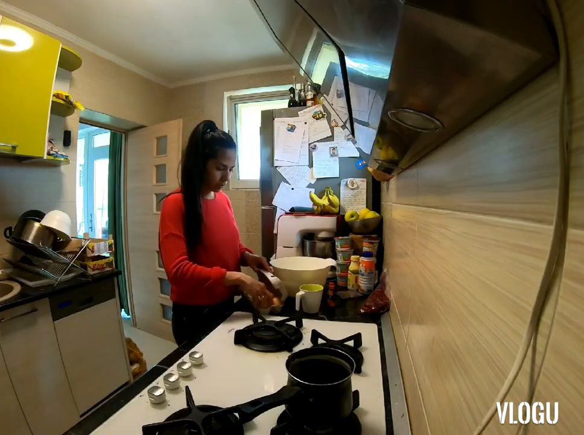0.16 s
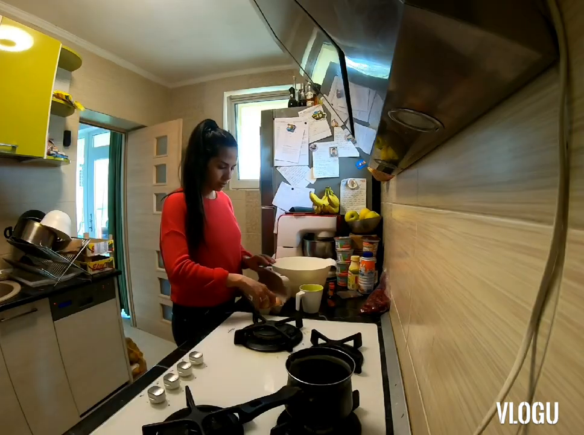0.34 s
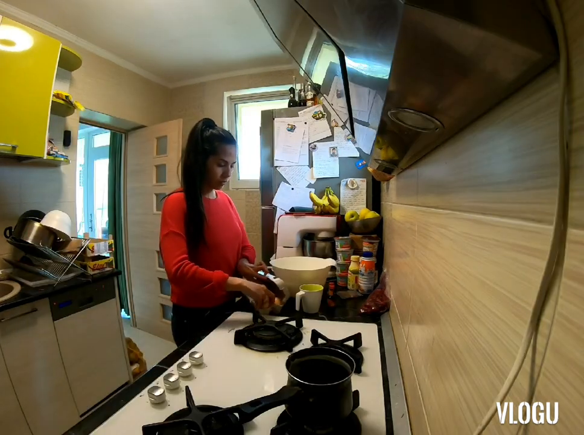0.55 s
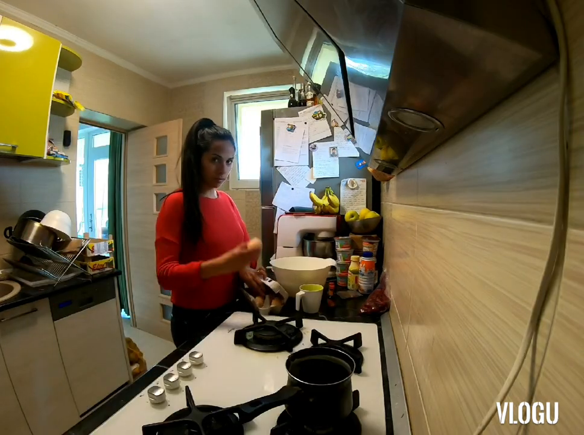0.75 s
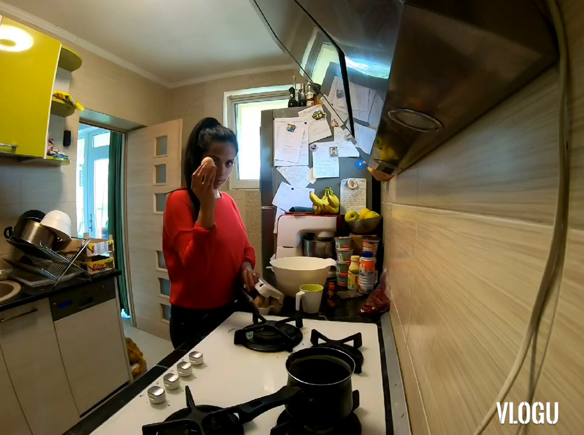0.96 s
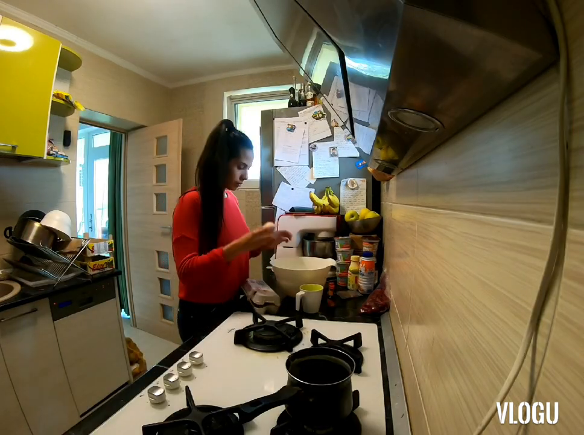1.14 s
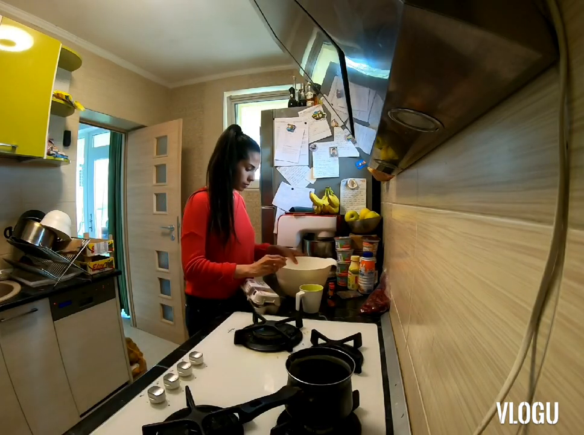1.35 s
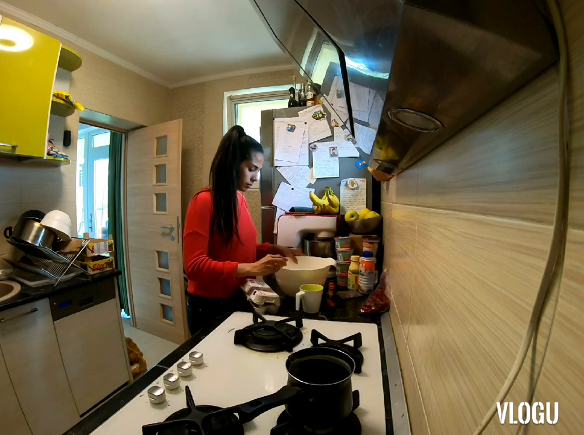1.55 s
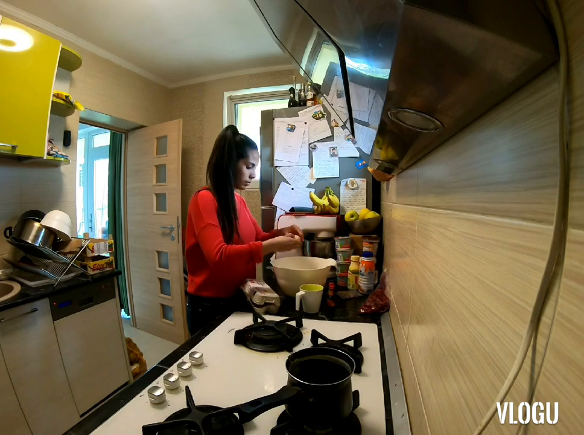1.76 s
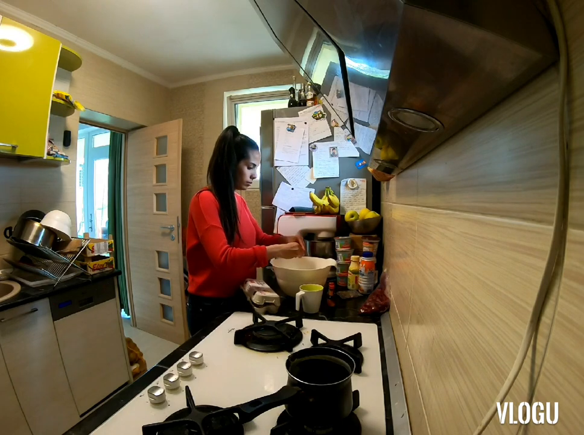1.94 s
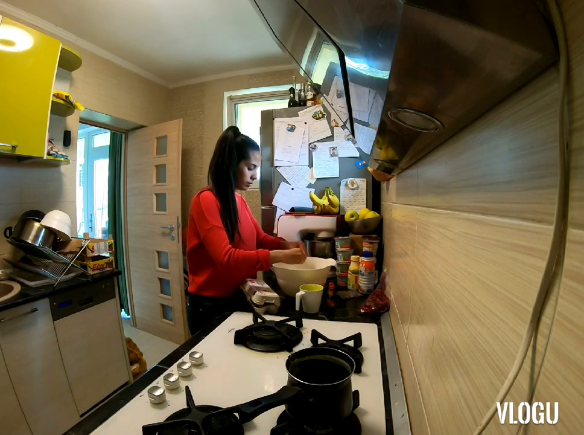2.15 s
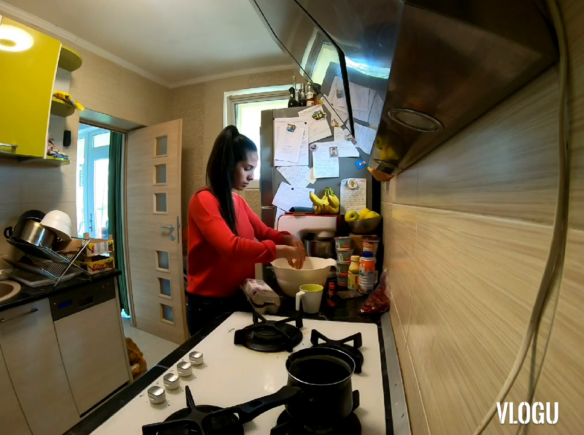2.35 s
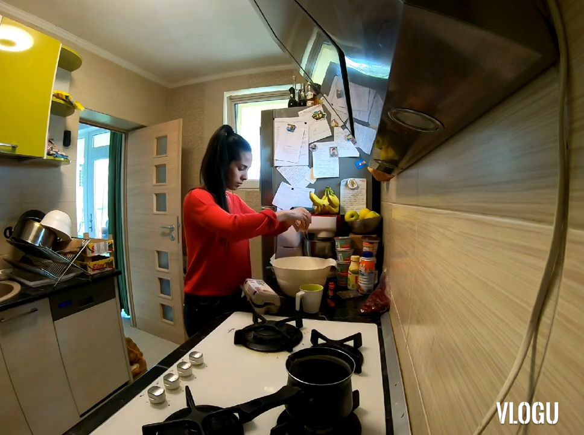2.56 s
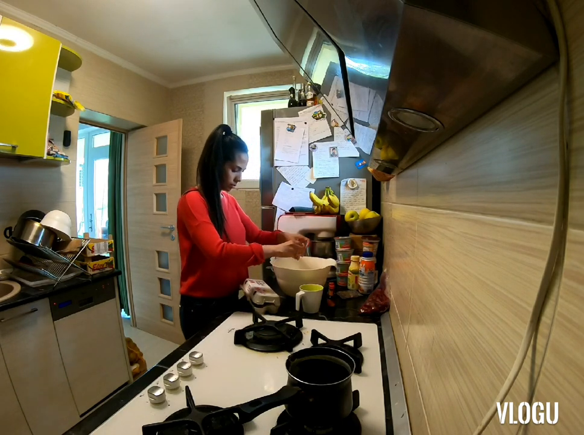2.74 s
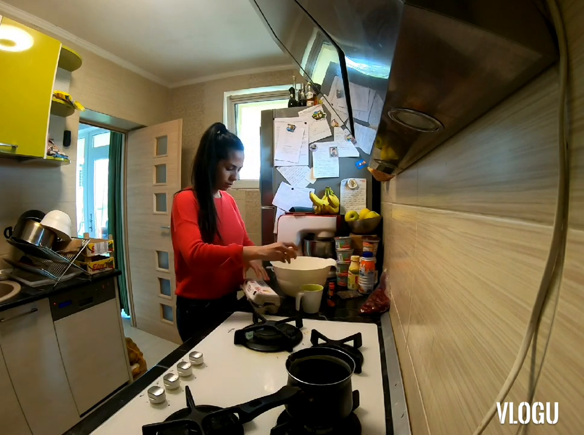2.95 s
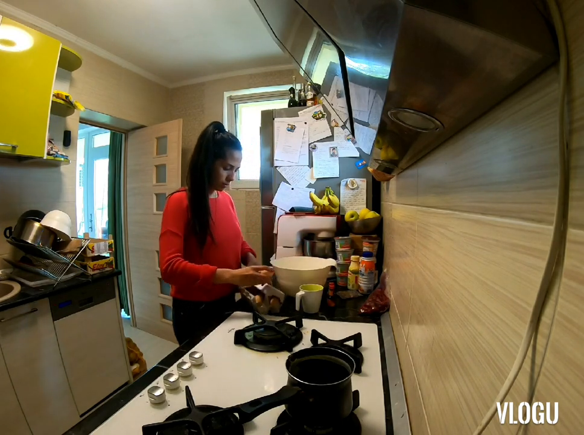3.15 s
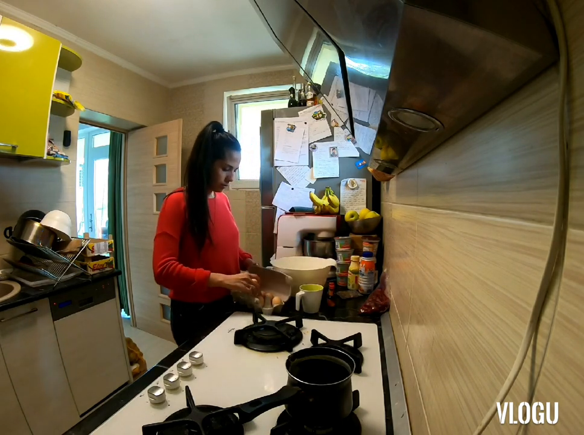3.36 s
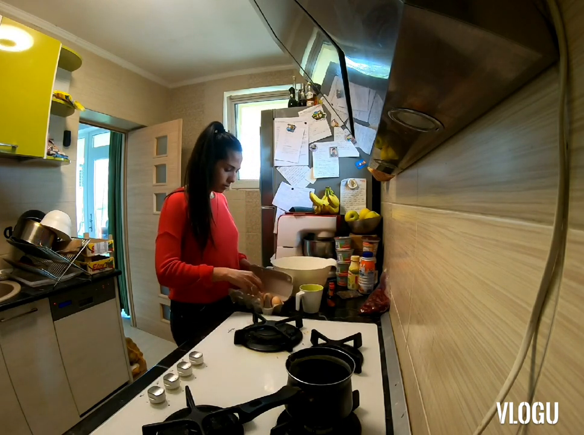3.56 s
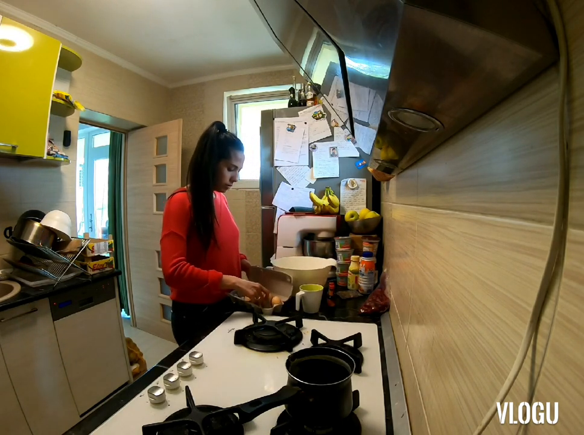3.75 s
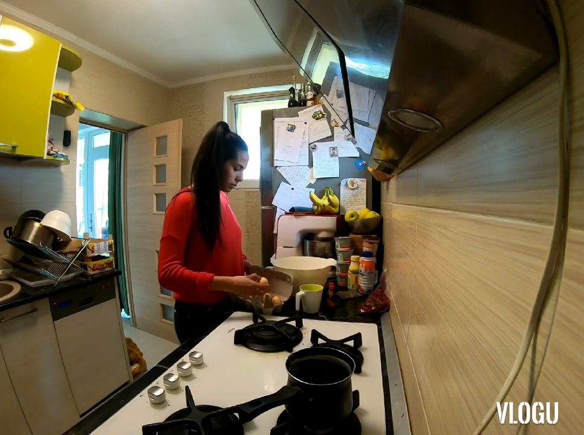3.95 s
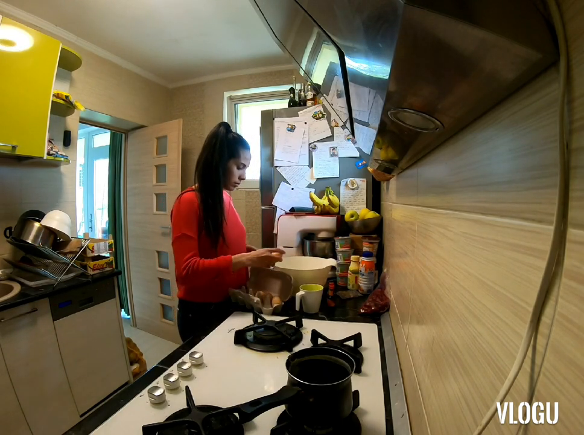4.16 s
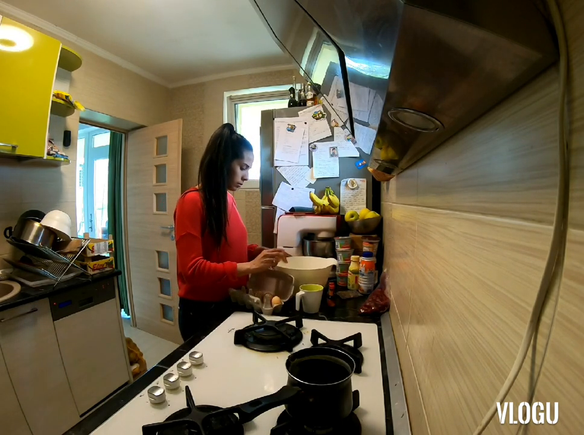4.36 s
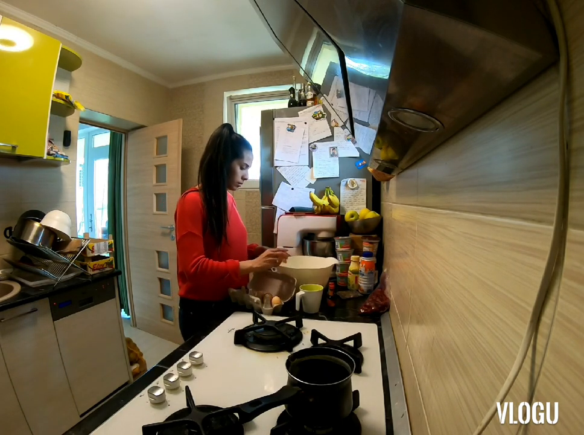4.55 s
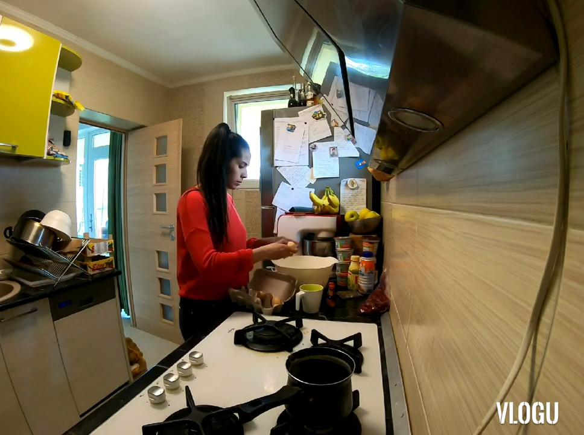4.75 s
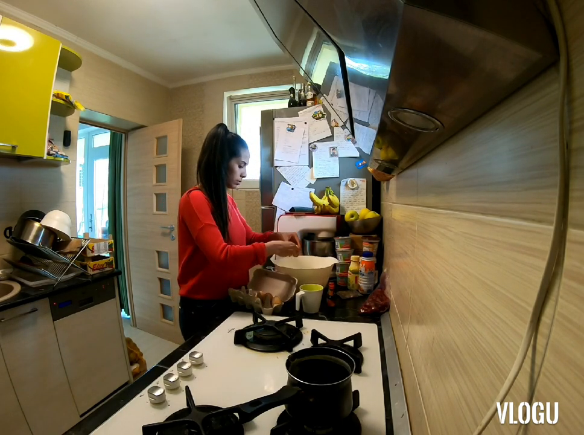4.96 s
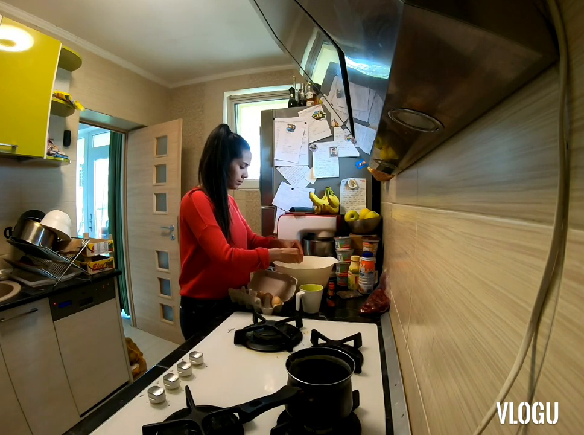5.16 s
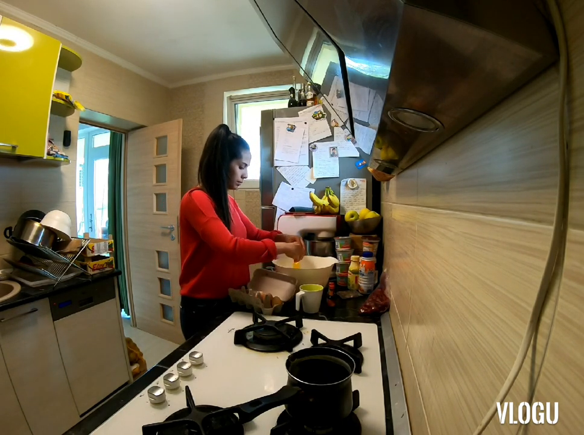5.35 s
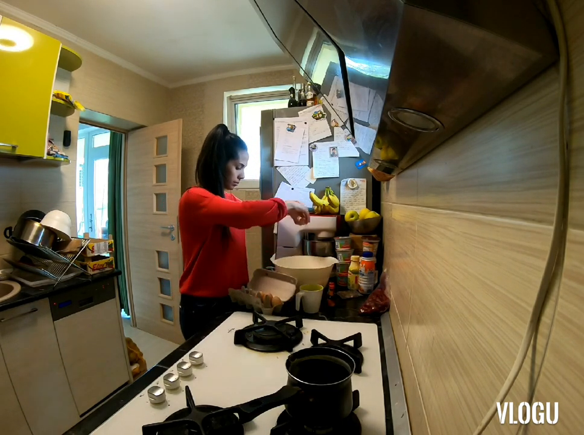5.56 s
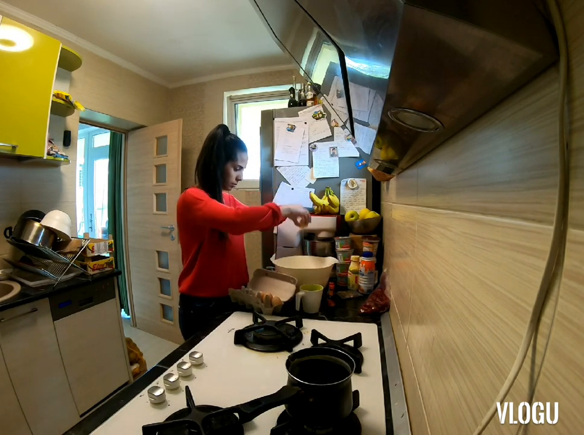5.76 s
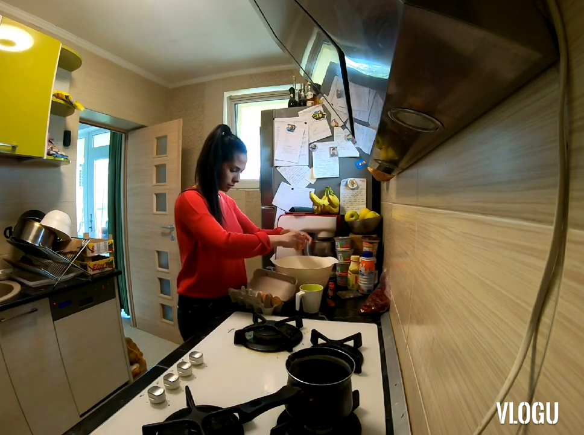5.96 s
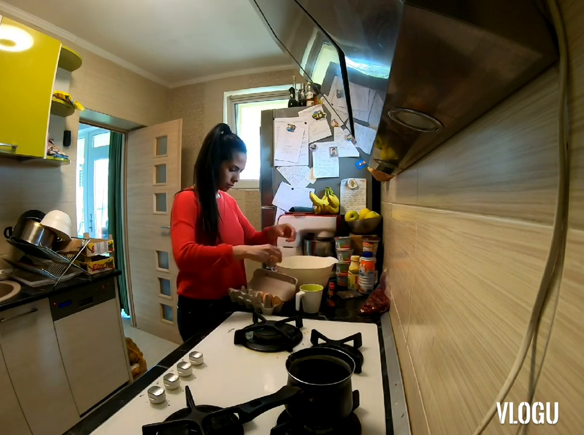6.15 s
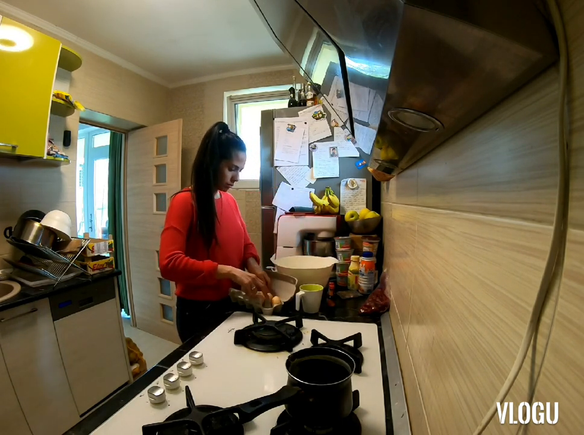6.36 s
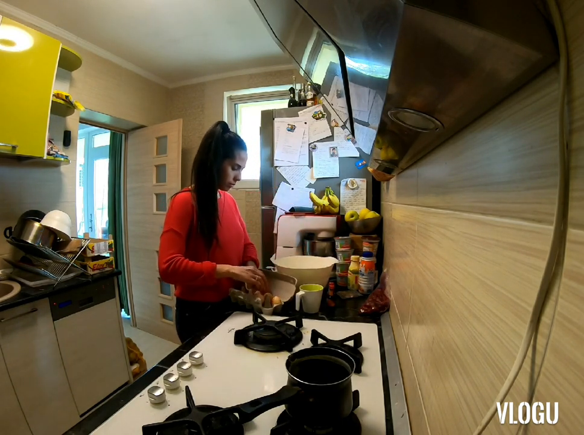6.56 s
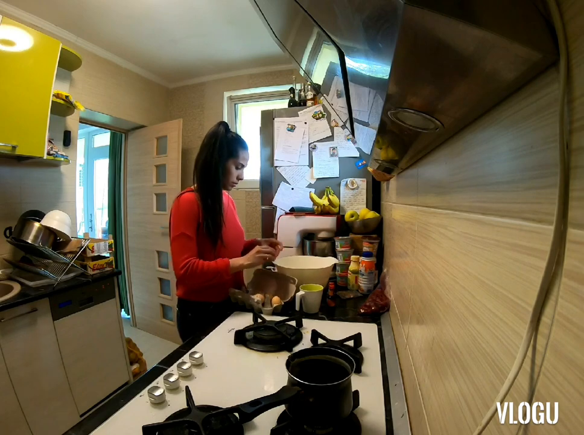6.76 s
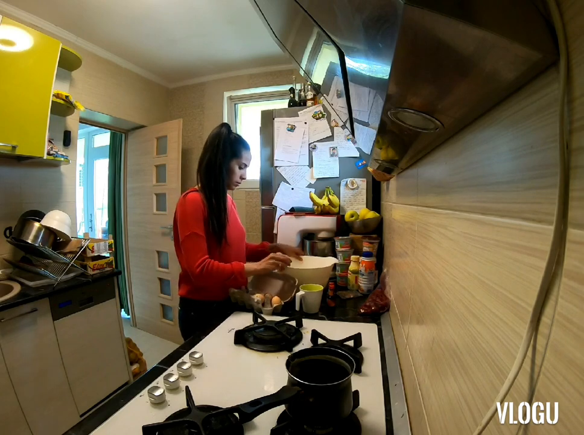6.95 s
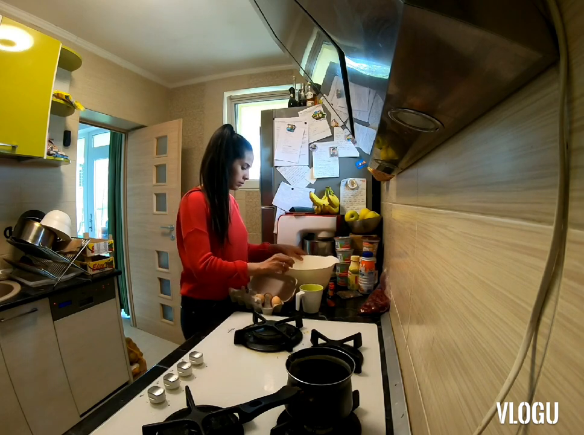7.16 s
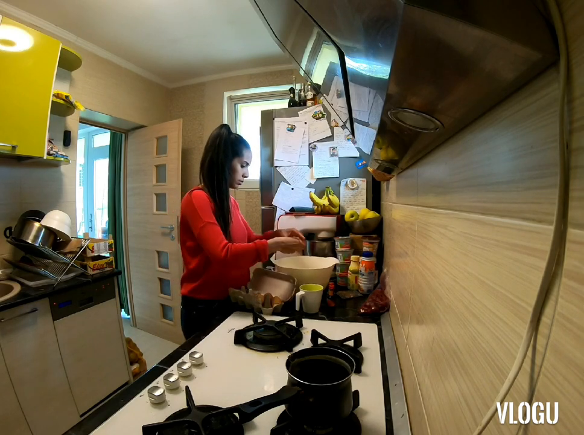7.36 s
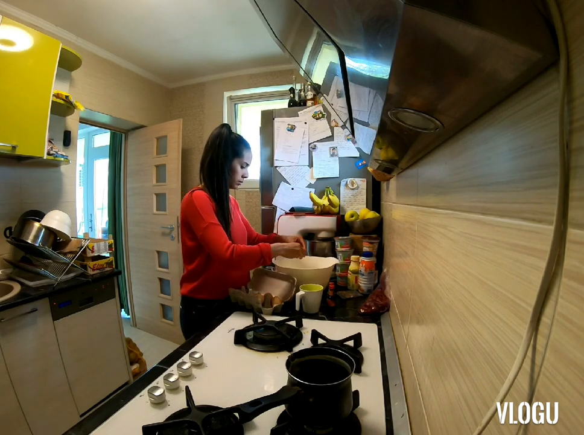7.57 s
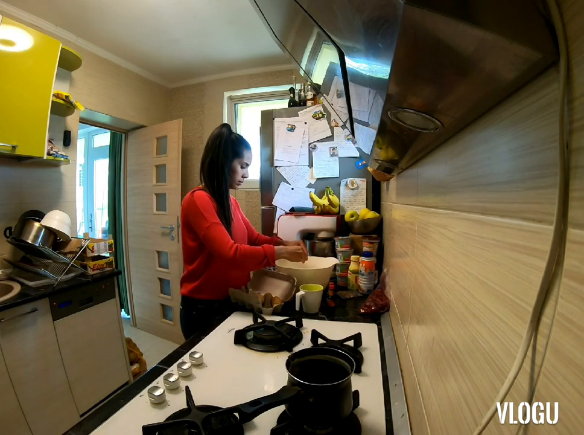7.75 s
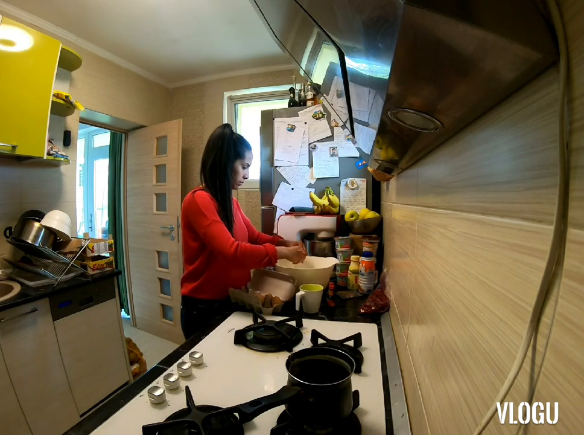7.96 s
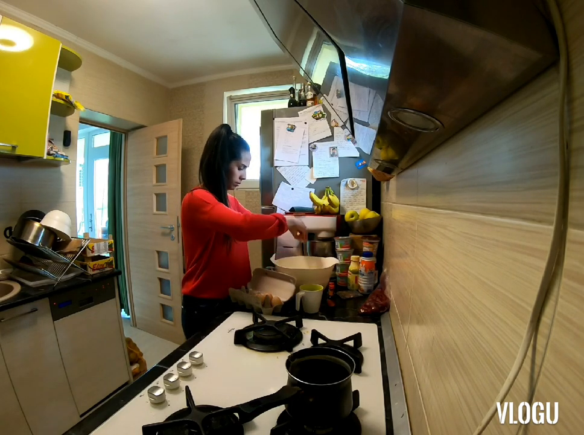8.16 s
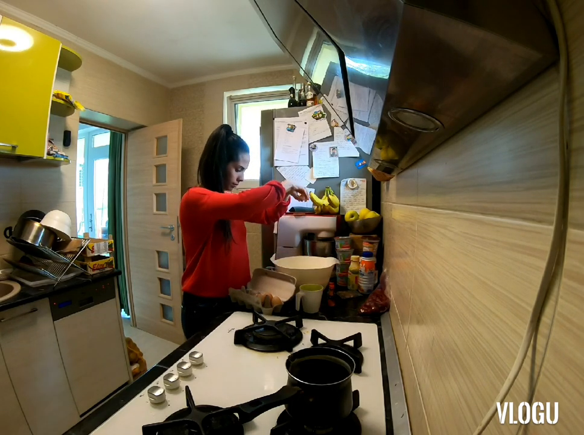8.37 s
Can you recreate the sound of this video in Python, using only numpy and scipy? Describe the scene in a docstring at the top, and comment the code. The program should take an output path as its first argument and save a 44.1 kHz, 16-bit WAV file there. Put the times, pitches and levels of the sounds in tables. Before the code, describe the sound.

Three eggs are cracked one after another at a kitchen counter. Each begins with papery rubbing, crinkles and little tocks from the pack, then firm plasticky thuds with a clack and brief low counter boom as it meets the bowl rim. Shell caves in with gritty crunches, then thin splinters click and snap with small high hollow notes. Mono pickup in a small reflective room, quiet fuzzy hum beneath, no deep silence.

```python
"""Over room air and a quiet appliance hum, three eggs in turn rustle and bump out of their pack,
noise-like crinkles and short resonant tocks, with soft low thumps. Each is knocked on a plastic bowl's rim:
thud, clack, decaying bowl modes and counter boom. The shell caves in as runs of tiny fractures,
crackles faintly as it is pried, then snaps apart with small hollow notes; a small kitchen echoes the clicks."""
import sys
import numpy as np
from scipy import signal
from scipy.fft import rfft, irfft, next_fast_len
from scipy.io import wavfile
from scipy.ndimage import map_coordinates

SR = 44100
rng = np.random.default_rng(int(sys.argv[2]) if len(sys.argv) > 2 else 0)


def unload_audio(sound):
    """Save the sound as a 16-bit wav file, at the path given as the first command line argument."""
    columns = np.transpose(np.atleast_2d(sound))
    # keep every value between -1 and 1, then stretch to whole-number steps
    steps = np.round(np.clip(columns, -1, 1) * 32767)
    wavfile.write(sys.argv[1], SR, steps.astype(np.int16))


N = 370881
SIZE = 16384  # samples in one short sound
T = np.arange(SIZE) / SR
HZ = np.fft.rfftfreq(SIZE, 1 / SR)
GRIP_S, RELEASE_T60_S = 0.011, 0.21
# Levels in the tables are relative: the *_db arguments of each function add to them.


def amp(db):
    """Decibels to gain."""
    return 10 ** (np.asarray(db) / 20)


def unit(x):
    """Scale to rms 1."""
    return x / np.sqrt(np.mean(x ** 2) + 1e-20)


def sized(x):
    """Scale a short sound to the energy of one millisecond at rms 1."""
    return x / np.linalg.norm(x) * np.sqrt(SR / 1000)


def along(points, hz):
    """(Hz, value) points read on a log axis."""
    f, v = np.transpose(points)
    return np.interp(np.log(hz + 1), np.log(f), v)


def swell(s, length_s, rise_s):
    """Gain of one movement: builds up from time s, holds, dies away."""
    t = np.arange(N) / SR - s
    return np.clip(t / rise_s, 0, 1) * amp(-60 * np.maximum(t - length_s, 0) / RELEASE_T60_S)


def wobble(rate_hz):
    """Smooth random curve, rate_hz knots a second."""
    knots = rng.standard_normal(int(N * rate_hz / SR) + 4)
    return map_coordinates(knots, [np.arange(N) * rate_hz / SR])


def filtered(x, response):
    """x times a response of frequency."""
    m = next_fast_len(N + SIZE)
    return irfft(rfft(x, m) * response(np.fft.rfftfreq(m, 1 / SR)), m)[:N]


def noise(response):
    """Coloured noise of rms 1."""
    return unit(filtered(rng.standard_normal(N), response))


def peak(f, hz, width_hz):
    """Gain of one resonance."""
    return np.abs(f * width_hz / (hz ** 2 - f ** 2 + 1j * f * width_hz))


def pulse(gain):
    """Minimum-phase pulse with this spectrum, by folding its cepstrum."""
    cepstrum = irfft(np.log(np.maximum(gain / gain.max(), 1e-6)))
    cepstrum[1:SIZE // 2] *= 2
    cepstrum[SIZE // 2 + 1:] = 0
    return sized(irfft(np.exp(rfft(cepstrum))))


def through(x, y):
    """Convolve two short sounds."""
    return signal.fftconvolve(x, y)[:SIZE]


def coloured(snaps, gain, ripple_db=4, ripple_hz=2200):
    """Snaps ring a body of this spectrum; each spot struck has mild middle resonances of its own."""
    knots = rng.standard_normal(int(SR / 2 / 110) + 4)  # one per 110 Hz
    ripple = np.tanh(unit(map_coordinates(knots, [HZ / 110])))
    spot_gain = amp(ripple_db * ripple * peak(HZ, ripple_hz, 2 * ripple_hz))
    return sized(through(snaps, pulse(gain * spot_gain)))


def crumble(length_s, spread_db, count=14, start_db=-6, build_s=0.012):
    """A running crack: tiny snaps of uneven size and spacing that build up as it spreads; energy 1."""
    when_s = (np.arange(count) + rng.random(count)) / count * length_s
    size_db = spread_db * rng.standard_normal(count) + start_db * np.exp(-when_s / build_s)
    sizes = amp(size_db) * rng.choice([-1, 1], count)
    train = np.bincount(np.minimum((when_s * SR).astype(int), SIZE - 1), sizes, SIZE)
    return train / np.linalg.norm(train)


def crackle(rate, echo_db=8, t60=0.2):
    """Random tiny snaps, rate a second, a few larger than the rest, in their own diffuse echo; rms 1."""
    hits = (rng.random(N) < rate / SR) * rng.choice([-1, 1], N)
    snaps = hits * amp(-16 * rng.random(N)) / np.sqrt(rate)
    echo_power = signal.fftconvolve(snaps ** 2, amp(-60 * T / t60) ** 2)[:N]
    echo = rng.standard_normal(N) * np.sqrt(np.abs(echo_power))
    return unit(unit(snaps) + amp(echo_db) * unit(echo))


def room(snaps, wet_db, t60, near_db=-1, near_t60=0.15, gap_s=0.00049, dull_hz=10800):
    """Snaps with diffuse echoes: quick ones off wall and hood, then the kitchen's tail."""
    tail = unit(amp(-60 * T / t60)) ** 2
    near = unit(amp(-60 * T / near_t60)) ** 2 * amp(2 * near_db)
    fade = (tail + near) * (1 - np.exp(-(T / gap_s) ** 2))
    # echoes of different snaps add in power
    echo = rng.standard_normal(SIZE) * np.sqrt(np.abs(through(snaps ** 2, fade)))
    # the walls swallow the highest treble
    echo = signal.lfilter(*signal.butter(5, dull_hz, fs=SR), echo / np.linalg.norm(echo))
    return snaps / np.linalg.norm(snaps) + amp(wet_db) * echo


def add(track, s, sound):
    """Mix a sound in at time s."""
    part = track[max(round(s * SR), 0):][:len(sound)]
    part += sound[:len(part)]


# Colour of the room air. Each row: frequency in Hz, relative level in dB.
AIR_COLOUR = [(20, -34), (38, -4), (156, -6), (229, -11.5), (286, -6), (340, -14), (520, -20), (800, -22.5),
              (1000, -31), (1200, -30), (1400, -28), (2000, -30.5), (3300, -29), (4800, -38.5),
              (7000, -40.5), (10000, -50.5), (12000, -87)]
# Appliance resonances. Each row: frequency in Hz, width in Hz before narrowing, relative level in dB.
HUM_MODES = [(97.2, 15.5, -1), (162.7, 79, -6), (282.5, 26.3, -2.5), (747, 28, -19), (845, 33, -22),
             (1326, 68, -22), (1475, 110, -25), (1710, 42, -30.5)]
DRAUGHT_S, DRAUGHT_LENGTH_S, DRAUGHT_RISE_S, DRAUGHT_DB = 3.88, 0.34, 0.3, -41.5


def background(air_db=-55.0, hum_db=-54.0, drift_db=1.9, flutter_db=0.4, narrowing=0.72):
    """Noise shaped into room air, the appliance's fuzzy hum and one puff of air on the microphone."""
    air = noise(lambda f: amp(along(AIR_COLOUR, f)))
    hum = noise(lambda f: sum(amp(db) * peak(f, hz, narrowing * width_hz) ** 2
                              for hz, width_hz, db in HUM_MODES))
    rumble = noise(lambda f: peak(f, 18.6, 22) ** 2)
    air_level = amp(air_db + flutter_db * wobble(19))
    hum_level = amp(hum_db + drift_db * wobble(4.4))
    puff = amp(DRAUGHT_DB) * swell(DRAUGHT_S, DRAUGHT_LENGTH_S, DRAUGHT_RISE_S)
    return air_level * air + hum_level * hum + puff * rumble


# The pack's own resonances. Each row: frequency in Hz, width in Hz, relative level in dB.
TRAY_MODES = [(397.5, 42, 0.5), (594, 120, -6.5), (826, 105, -6), (1040, 53, -1.5)]


def tray(f):
    """Gain of the hollow pack: its resonances summed."""
    return sum(amp(db) * peak(f, hz, width_hz) for hz, width_hz, db in TRAY_MODES)


# Strokes of the hand on the pack. Each row: start in seconds, length in seconds, rub in dB, crinkle in dB.
STROKES = [(0.009, 0.42, -57, -59.5), (0.524, 0.1, -52.5, -60.5), (0.634, 0.21, -53.5, -66),
           (0.862, 0.21, -60.5, -76), (1.043, 0.13, -56, -67), (1.142, 0.1, -67, -50.5),
           (1.329, 0.15, -57.5, -70), (3.182, 0.17, -53, -69), (3.373, 0.4, -58.5, -74),
           (3.766, 0.17, -55.5, -58), (3.954, 0.15, -60.5, -64), (5.995, 0.28, -82, -70),
           (6.416, 0.071, -51.5, -64), (6.599, 0.13, -56.5, -72), (6.678, 0.038, -63, -66.5)]
# Colours of rub and crinkle. Each row: frequency in Hz, relative level in dB.
RUB_COLOUR = [(150, 15), (450, -2.5), (1000, -0.5), (1700, -4), (3200, -4), (5000, -11.5), (8000, -16.5),
              (12000, -53)]
CRINKLE_COLOUR = [(500, 0), (2500, 3), (5000, -1.5), (8000, -5), (10000, -8.5), (11500, -25), (13000, -65)]
# single crinkles in a light stroke merge into a swish in the hardest
CRINKLE_BASE_PER_S, CRINKLE_EXTRA_PER_S = 120, 1400


def rustle(rub_db=0, crinkle_db=1, grip_db=-0.34, tray_db=0):
    """The pack slides under the fingers in small jerks: a hollow rub with bright crinkles."""
    rub_level = sum(amp(db) * swell(s, length_s, GRIP_S) for s, length_s, db, _ in STROKES)
    crinkle_level = sum(amp(db) * swell(s, length_s, GRIP_S) for s, length_s, _, db in STROKES)
    rub = unit(filtered(crackle(rate=130, echo_db=18.0),
                        lambda f: amp(along(RUB_COLOUR, f)) * (1 + amp(tray_db) * tray(f))))
    rate = CRINKLE_BASE_PER_S + CRINKLE_EXTRA_PER_S * (crinkle_level / crinkle_level.max()) ** 4
    crinkle = unit(filtered(crackle(rate, echo_db=5, t60=0.16), lambda f: amp(along(CRINKLE_COLOUR, f))))
    both = amp(rub_db) * rub_level * rub + amp(crinkle_db) * crinkle_level * crinkle
    return amp(grip_db * wobble(45)) * both


BOOM_RISE_S = 0.0037  # the counter takes a moment to start swinging


def boom(hz, t60=0.17):
    """A low, soft-edged ring of the counter, slightly detuned at random."""
    tone = np.sin(2 * np.pi * hz * rng.uniform(0.9, 1.065) * T)
    return amp(-60 * T / t60) * (1 - np.exp(-T / BOOM_RISE_S)) * tone


# Soft thumps on counter and floor. Each row: start in seconds, level in dB, pitch in Hz before detuning.
THUMPS = [(0.034, -37.5, 152.5), (0.108, -34, 105), (1.426, -37.5, 110.5), (1.737, -29, 97.6),
          (1.793, -33.5, 115), (4.695, -40.5, 105), (4.845, -33.5, 114), (4.872, -38, 100),
          (7.227, -34, 133), (7.383, -37.5, 97)]


def thumps(gain_db=5):
    """Soft pushes that only stir a low resonance."""
    out = np.zeros(N)
    for s, db, hz in THUMPS:
        add(out, s, amp(db + gain_db) * boom(hz, t60=0.15))
    return out


JOSTLE_PER_S, JOSTLE_DB, JOSTLE_HZ, JOSTLE_TICK_DB = 12, -3.5, 835, -3  # JOSTLE_DB is re the rub


def jostles(spread_db=4.5, spread_octaves=0.64, count=6):
    """Eggs shift at random all through each stroke, on average louder the harder the pack is rubbed."""
    rows = []
    for s, length_s, rub_db, _ in STROKES:
        delays_s = (np.arange(count) + rng.random(count)) / JOSTLE_PER_S
        for delay_s, (size, pitch) in zip(delays_s, rng.standard_normal((count, 2))):
            if delay_s < length_s:
                db = rub_db + JOSTLE_DB + spread_db * size
                hz = JOSTLE_HZ * 2 ** (spread_octaves * pitch)
                rows.append((s + delay_s, db, hz, JOSTLE_TICK_DB))
    return rows


# Whole eggs bump in the pack. Each row: start in seconds, level in dB, pitch in Hz, tick trim in dB.
BUMPS = [(0.037, -45.5, 490, -2.5), (0.096, -49, 1210, -8), (0.173, -44.5, 590, -10), (.208, -56, 795, 0.5),
         (0.318, -52, 1370, 1.5), (.345, -55, 1000, -1), (.392, -57, 600, 5.5), (0.473, -48.5, 393, -2.5),
         (0.4965, -29, 1500, -7.5), (.507, -43, 1610, -4), (.562, -50, 890, 5), (.574, -51, 900, -10),
         (0.617, -40.5, 794, -8.5), (.657, -46.5, 686, -8), (.696, -44, 800, -8), (0.705, -35, 980, -7.5),
         (.717, -46, 1140, -7), (.768, -45, 990, -25), (0.837, -45.5, 680, -7), (1.034, -46, 773, -10),
         (1.228, -26, 770, -21), (1.34, -46, 568, -7.5), (3.201, -45, 1040, -23), (3.233, -41, 570, -24),
         (3.269, -43.5, 888, -9), (3.439, -52, 1017, 5.5), (3.476, -51, 520, -20), (3.586, -40, 696, -6.5),
         (3.631, -41, 1080, -19), (3.717, -42, 636, -6.5), (3.784, -54, 915, -4), (3.823, -43.5, 1070, -8),
         (3.868, -45, 516, 1.5), (3.887, -42.5, 435, -2.5), (3.97, -61.5, 900, 11.5),
         (4.018, -61, 1000, 12), (6.449, -39, 1260, -29), (6.464, -37.5, 610, -11),
         (6.744, -34.5, 1453, -6.5)]
# Colour of the scuff. Each row: frequency in Hz, relative level in dB.
TICK_COLOUR = [(200, -36), (800, 7.5), (2500, 18.5), (4000, 12), (7000, 4.5), (10000, -2), (12000, -41),
               (15000, -100)]


def bumps(body_db=8, tick_db=7, tray_db=-2):
    """A whole egg gives a short tock that rings the pack, with a scuff on top."""
    out = np.zeros(N)
    for s, db, hz, bright_db in BUMPS + jostles():
        body = peak(HZ, hz, 0.35 * hz) ** 2 + amp(tray_db) * tray(HZ) ** 2
        tock = coloured(room(signal.unit_impulse(SIZE), wet_db=8.5, t60=0.11), body)
        scrape = room(crumble(0.0035, spread_db=6.0, count=10), wet_db=11.0, t60=0.16)
        scuff = coloured(scrape, amp(along(TICK_COLOUR, HZ)))
        add(out, s, amp(db) * (amp(body_db) * tock + amp(tick_db + bright_db) * scuff))
    return out


# Bowl modes. Each row: frequency in Hz, relative level in dB before random spread, t60 in seconds.
BOWL_MODES = [(269, 3.5, 0.094), (413, 4.5, 0.091), (491.5, -0.5, 0.19), (534.4, -5, 0.2), (633, -5, 0.16),
              (692, -8.5, 0.16), (753, -7.5, .16), (838, -5, 0.18), (1190, -19, .15), (1280, -17, 0.18),
              (1760, -25, .12), (2160, -21, 0.22), (2400, -30, .15)]
RING_RISE_S = 0.004
SPOT_DB, SPOT_WIDTH_HZ = 10, 26  # the mode that moves most at the struck spot rings louder


def bowl_ring(spot_hz):
    """Decaying sines, one per bowl mode, favouring those near spot_hz."""
    ring = np.zeros(SIZE)
    for hz, mode_db, t60 in BOWL_MODES:
        db = mode_db + SPOT_DB * peak(hz, spot_hz, SPOT_WIDTH_HZ) + rng.normal(0, 1.5)
        ring += amp(db - 60 * T / t60) * np.sin(2 * np.pi * hz * T + rng.uniform(0, 2 * np.pi))
    return ring * (1 - np.exp(-T / RING_RISE_S))


# Egg meets rim. Each row: start in seconds, blow level in dB, then trims in dB for clack, counter boom
# and ring, and the frequency in Hz at which this spot of the rim rings most.
KNOCKS = [(1.4919, -34, -2, 5, -18, 412), (1.498, -27.5, -1.5, 1, -14, 412),
          (1.6, -22.5, -29, -1.5, -11.5, 637), (1.695, -30, -5, -8, -20, 412),
          (1.737, -34.5, -12, 2, -15, 637), (4.435, -43, -14, -5, -19, 490),
          (4.445, -13.5, -16.5, -18, -15.5, 490), (4.5468, -20.5, -21, -7, -15, 546),
          (4.657, -32.5, -22, 1, -12.5, 490), (4.723, -39.5, -10, -1, -14, 490),
          (4.766, -31, -7, -3, -20, 412), (4.802, -37.5, -26, 8, -4.5, 546),
          (7.103, -42, -8, -14, -17, 412), (7.1117, -15, -13.5, -3, -15, 700),
          (7.196, -40, 3, -4, -18, 546), (7.208, -25.5, -31, 0, -18, 412), (7.24, -38, -14, -2, -15, 546),
          (7.315, -32.5, -11, 0, -17, 637)]
# Colours of thud and clack. Each row: frequency in Hz, relative level in dB.
THUD_COLOUR = [(30, -44.5), (100, 7.5), (160, -2), (205, -15.5), (280, 1), (400, -2), (560, -0.5),
               (720, -0.5), (950, -23.5), (1500, -42), (4000, -78), (9000, -114)]
CLACK_COLOUR = [(300, 8.5), (900, -7.5), (1400, 0), (2300, -3), (3100, -11.5), (4500, -24.5), (9000, -33),
                (12000, -72), (16000, -102)]
# Near walls throw each thud back. Each row: shortest delay in seconds, level in dB.
WALLS = [(0.011, -17.5), (.024, -20), (.037, -19)]
LEAD_IN_S, LEAD_IN_DB = 0.002, -20.5  # a faint copy of the thud 2 ms before each blow


def knocks(thud_db=7, clack_db=8, boom_db=-6):
    """Each blow pushes the rim, clacks the hard shell, rings the bowl briefly and shakes the counter."""
    out = np.zeros(N)
    contact = signal.unit_impulse(SIZE)
    push = amp(along(THUD_COLOUR, HZ))
    for s, db, hard_db, low_db, ring_db, spot_hz in KNOCKS:
        ring = amp(ring_db) * bowl_ring(spot_hz)
        thud = coloured(room(contact, wet_db=-14.5, t60=0.34), push)
        clack = coloured(room(contact, wet_db=12.5, t60=0.23), amp(along(CLACK_COLOUR, HZ)))
        shake = boom(hz=104.5, t60=0.34)
        blow = amp(db + thud_db) * pulse(push)
        add(out, s - LEAD_IN_S, amp(LEAD_IN_DB) * blow)
        for delay_s, wall_db in WALLS:
            add(out, s + delay_s * rng.uniform(1.0, 1.1), amp(wall_db) * blow)
        hit = amp(thud_db) * thud + amp(clack_db + hard_db) * clack + ring + amp(boom_db + low_db) * shake
        add(out, s, amp(db) * hit)
    return out


# Shell breaks on the rim. Each row: start in seconds, level in dB, treble tilt in dB (reached at 3 kHz),
# length in seconds, shell resonance in Hz, its height in dB, later crumbling in dB re level.
CRACKS = [(1.6, -28, -11, 0.0017, 1450, 10, -4), (1.603, -23, -8, 0.0067, 1400, 8, -7),
          (1.679, -25, -2, .016, 2050, 13, -16), (1.694, -26, 6, 0.0039, 2250, 12.5, -14),
          (1.729, -39.5, -3, 0.0089, 2200, 15, -5.5), (4.547, -22.5, -3.5, 0.0025, 1500, 9.5, -13),
          (4.552, -22, -8.5, 0.0066, 1960, 16, -10), (4.568, -32, 2, 0.0047, 1500, 11, -17),
          (4.591, -33, -6.5, .01, 2400, 10, -6), (4.641, -31, -13, .012, 2000, 6, -8),
          (4.65, -28, -2.5, .018, 2230, 6.5, -20), (4.724, -34.5, -13, 0.004, 1300, 9, -21),
          (4.753, -27.5, -1, 0.011, 2500, 9, -23), (4.762, -27.5, 3, 0.0098, 2860, 5, -22),
          (4.797, -35.5, -5, .008, 2430, 16, -5.5), (4.806, -33, -3.5, 0.013, 2430, 11, -9),
          (7.1945, -34, -4, .0045, 2000, 11, -12), (7.208, -25.5, -10, .003, 1380, 8, -10),
          (7.211, -17.5, -8, .015, 1750, 2.5, -6), (7.3157, -29, -10.5, 0.0026, 1510, 6, -27),
          (7.32, -24.5, -6.5, .005, 1660, 11.5, -32), (7.325, -27, -4, .007, 1460, 6, -35)]
CRUMBLE_S, CRUMBLE_LENGTH_S = 0.023, 0.011  # delay and length of the dent's spreading
DENT_PITCH = 1.07  # the spreading dent breaks smaller, higher flakes


def breaks():
    """Every break of the shell, and the weaker crumbling as its dent spreads."""
    rows = [row[:-1] for row in CRACKS]
    for s, db, treble_db, _, hz, shell_db, later_db in CRACKS:
        rows.append((s + CRUMBLE_S, db + later_db, treble_db, CRUMBLE_LENGTH_S, hz * DENT_PITCH, shell_db))
    return rows


# Colour of the fractures. Each row: frequency in Hz, relative level in dB.
FRACTURE_COLOUR = [(150, 3.5), (600, 3), (1000, -2), (1600, -2), (2400, -6), (3300, -7), (4800, -10.5),
                   (6500, -10.5), (9800, -15), (12000, -30), (15000, -50)]


def cracks(gain_db=3.5, shell_width=0.22):
    """The shell caves in as a quick run of tiny fractures that ring its wall."""
    out = np.zeros(N)
    for s, db, treble_db, length_s, hz, shell_db in breaks():
        tilt_db = treble_db * 2 * HZ / (HZ + 3000)
        colour_db = along(FRACTURE_COLOUR, HZ) + tilt_db + shell_db * peak(HZ, hz, shell_width * hz)
        run = crumble(length_s, spread_db=4, count=36, start_db=-7.0, build_s=0.21 * length_s)
        fractures = room(run, wet_db=-0.5, t60=0.16)
        add(out, s, amp(db + gain_db) * coloured(fractures, amp(colour_db)))
    return out


# Thumbs work into the cracked shell. Each row: start in seconds, length in seconds, level in dB.
PRYING = [(1.885, 0.72, -77.5), (5.116, .34, -88), (7.674, 0.78, -81)]
# Colour of splinters, here and in shells(). Each row: frequency in Hz, relative level in dB.
SPLINTER_COLOUR = [(300, 3), (1200, 0.5), (3000, 8), (5000, 6), (8000, 10), (10000, 5), (12000, -2.5),
                   (14000, -14), (15000, -57)]


def prying(rate=140):
    """Tiny splinters give way under the thumbs while the halves are worked apart."""
    effort = sum(amp(db) * swell(s, length_s, GRIP_S) for s, length_s, db in PRYING)
    return effort * unit(filtered(crackle(rate, echo_db=5), lambda f: amp(along(SPLINTER_COLOUR, f))))


# Shell halves snap and touch. Each row: start in seconds, level in dB, cavity in Hz,
# its width as a share of that Hz, splinter trim in dB, length in seconds.
SHELLS = [(2.21, -59, 4430, .9, 15.5, .02), (2.312, -64, 3700, .7, 15, .013),
          (2.342, -40.5, 3020, 0.26, -1.5, .018), (2.441, -63.5, 4000, .6, 7, .004),
          (2.514, -45.5, 2800, 0.89, -3, .014), (2.54, -49.5, 1940, 0.51, -7, .0071),
          (2.856, -41, 1770, 0.12, -10, .0042), (2.879, -33.5, 1280, 0.21, -8.5, 0.00407),
          (2.88, -43.5, 3110, .14, -13, .004), (2.896, -43, 1180, 0.13, -25, .006),
          (2.911, -48, 1520, 0.13, -19, .005), (2.922, -47, 1135, 0.083, -24, .006),
          (5.159, -61, 3300, .8, 16.5, .012), (5.268, -54, 2840, 0.73, 0.5, .011),
          (5.359, -50.5, 2280, 0.47, -4, .0031), (5.375, -42, 3750, 0.27, -6, .016),
          (5.392, -48.5, 5640, 0.15, -2, .005), (5.443, -39.5, 2470, 0.16, -23, .004),
          (5.446, -44.5, 3400, 0.21, -19, .004), (5.462, -41.5, 2170, 0.15, -22, .005),
          (5.586, -51.5, 1940, 0.44, -16, .015), (5.636, -42, 1284, 0.22, -28, .0047),
          (6.079, -50, 1750, .35, -5.5, .01), (6.092, -40.5, 1300, 0.19, -23, .035),
          (7.691, -58.5, 3030, 0.59, 5.5, .011), (7.754, -62.5, 3500, .6, 11, .02),
          (7.984, -44.5, 3700, 1, 5, .0031), (7.998, -35.5, 3440, 0.25, -5, .006),
          (8.005, -39, 3750, .45, -5, .006), (8.082, -44, 2750, 0.25, -21, .004),
          (8.092, -39, 2900, .36, -17, .006), (8.109, -51, 3070, 0.52, -3, .01),
          (8.154, -61, 5760, 0.36, -8, .004), (8.197, -50.5, 2020, .35, -6, .004),
          (8.21, -47.5, 2780, 0.19, -4, .014), (8.221, -45, 1980, 0.61, -5, .005),
          (8.248, -52, 2880, .25, -3, .012), (8.267, -43.5, 2620, .35, -9.5, .006),
          (8.293, -43.5, 6460, 0.12, -20, .004), (8.296, -46.5, 2940, 0.21, -5, .012)]
SETTLE_S, SETTLE_DB, SETTLE_PITCH, SETTLE_DULL_DB = 0.014, -18.5, 0.91, -14


def touches():
    """Every snap of the halves, and the touch with which they settle into each other."""
    rows = list(SHELLS)
    for s, db, hz, width, bright_db, length_s in SHELLS:
        rows.append((s + SETTLE_S, db + SETTLE_DB, hz * SETTLE_PITCH, width,
                     bright_db + SETTLE_DULL_DB, length_s))
    return rows


TONE_DB, TONE_WIDTH, TONE_T60_S = -9, 0.12, 0.17  # hollows wider than TONE_WIDTH ring less clearly
TONE_SAG, TONE_SAG_S, TONE_RISE_S = 0.045, 0.0088, 0.0015  # starts sharp by this share, then sinks


def note(hz):
    """The clear ring of the shell's hollow, sinking onto its pitch as the halves close."""
    pitch_hz = hz * (1 + TONE_SAG * np.exp(-T / TONE_SAG_S))
    envelope = amp(-60 * T / TONE_T60_S) * (1 - np.exp(-T / TONE_RISE_S))
    return sized(np.sin(2 * np.pi * np.cumsum(pitch_hz) / SR) * envelope)


def shells(cavity_db=5.5, splinter_db=6):
    """Splinters snap off and ring the shell's hollow; the narrower it is, the clearer its sinking note."""
    out = np.zeros(N)
    for s, db, hz, width, bright_db, length_s in touches():
        cavity = peak(HZ, hz, width * hz) ** 2 + amp(-21.5) * peak(HZ, 2.0 * hz, 1.4 * hz) ** 2
        cavity /= np.sqrt(1 + (0.48 * hz / (HZ + 1)) ** 10)  # little radiates below the resonance
        snaps = crumble(length_s, spread_db=0.5, count=9)
        hollow = coloured(room(snaps, wet_db=5, t60=0.16), cavity, ripple_db=1.5)
        crisp = coloured(room(snaps, wet_db=17, t60=0.15), amp(along(SPLINTER_COLOUR, HZ)))
        tone = amp(TONE_DB) * min(TONE_WIDTH / width, 1) ** 2 * note(hz)
        snap = amp(cavity_db) * (hollow + tone) + amp(splinter_db + bright_db) * crisp
        add(out, s, amp(db) * snap)
    return out


def scene():
    """Everything at the counter, in mono."""
    pack = rustle() + thumps() + bumps()
    eggs = knocks() + cracks() + prying() + shells()
    return (background() + pack + eggs)[None]


def record(dry, top_hz=14700):
    """The microphone keeps nothing above its band limit."""
    return np.array([filtered(channel, lambda f: f < top_hz) for channel in dry])


dry = scene()
out = record(dry)
unload_audio(out)
```